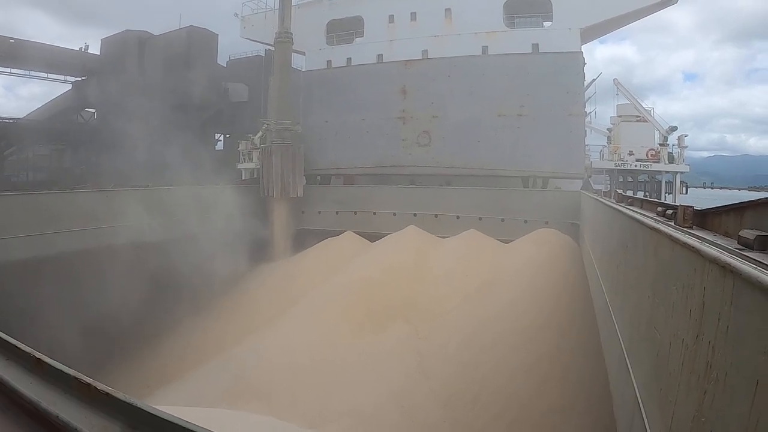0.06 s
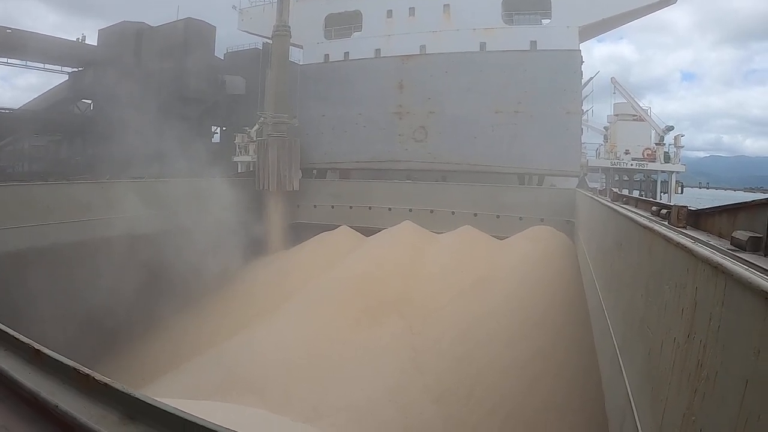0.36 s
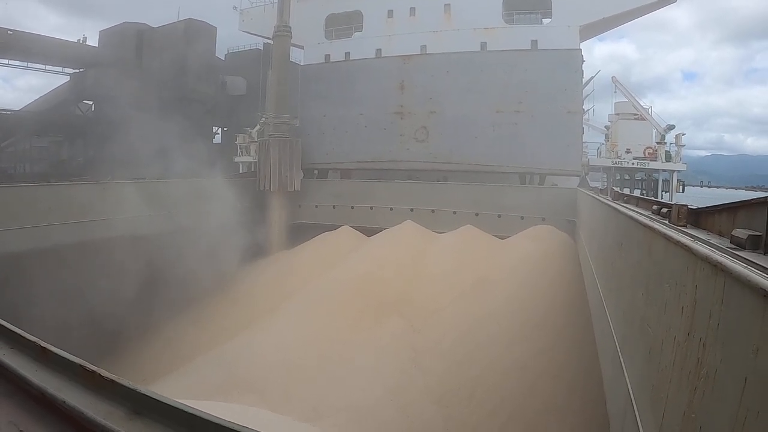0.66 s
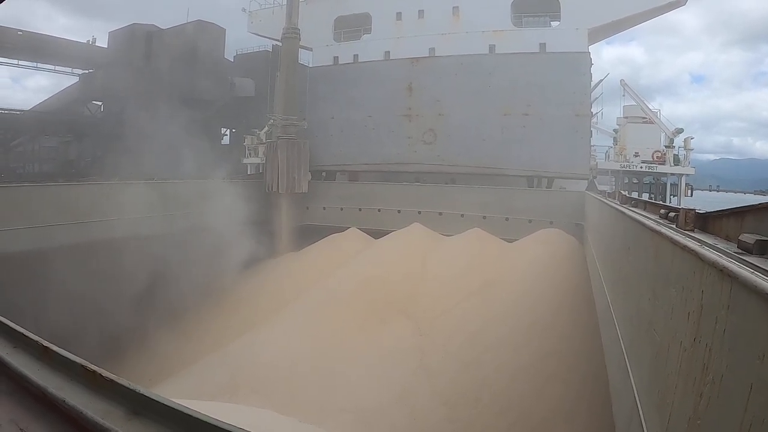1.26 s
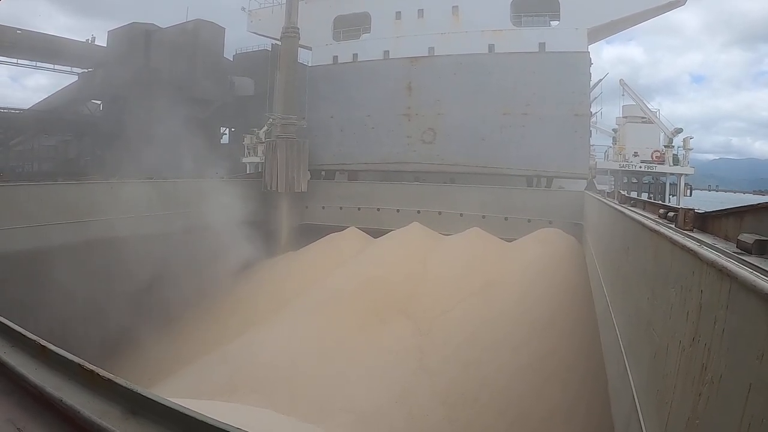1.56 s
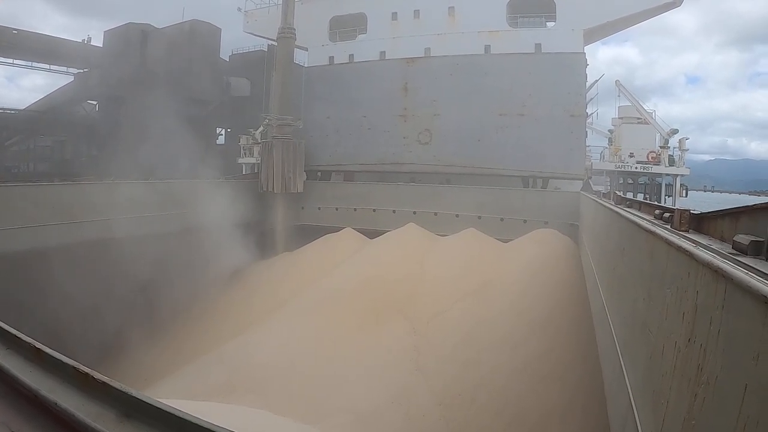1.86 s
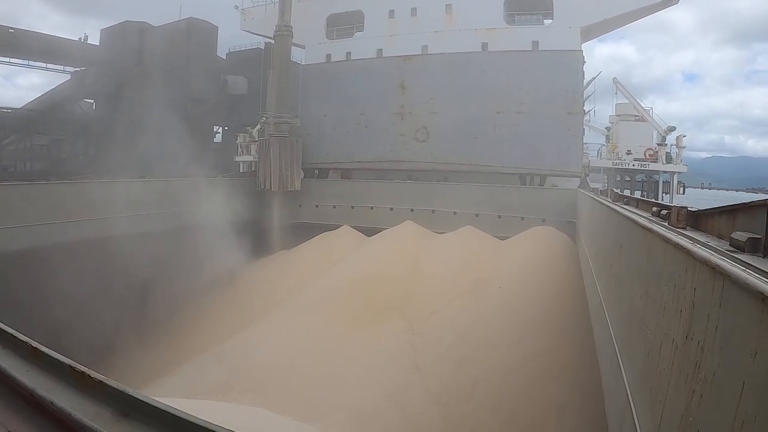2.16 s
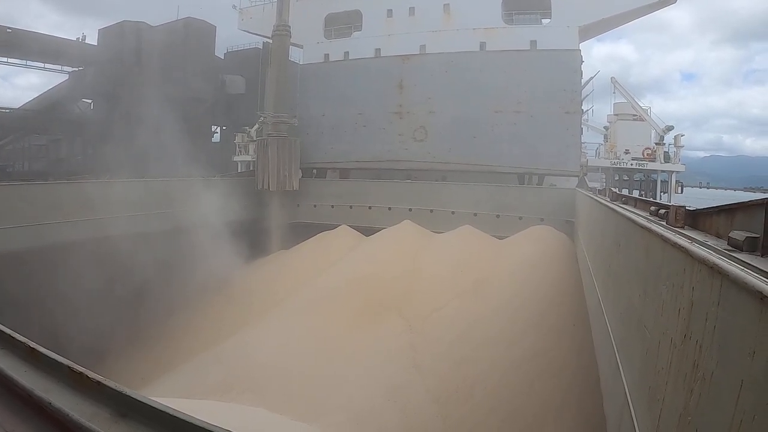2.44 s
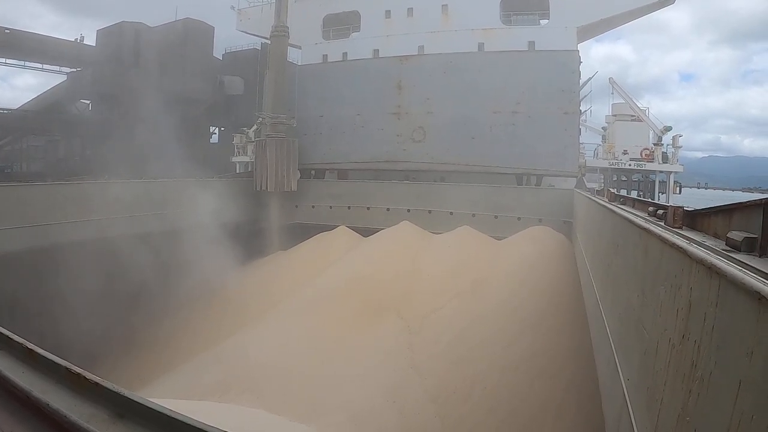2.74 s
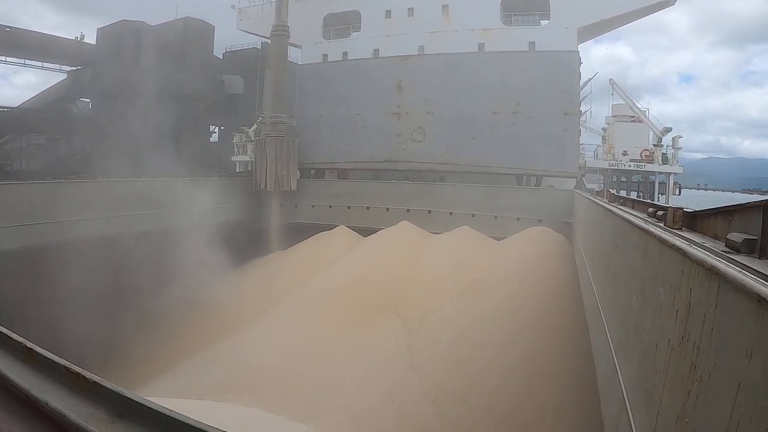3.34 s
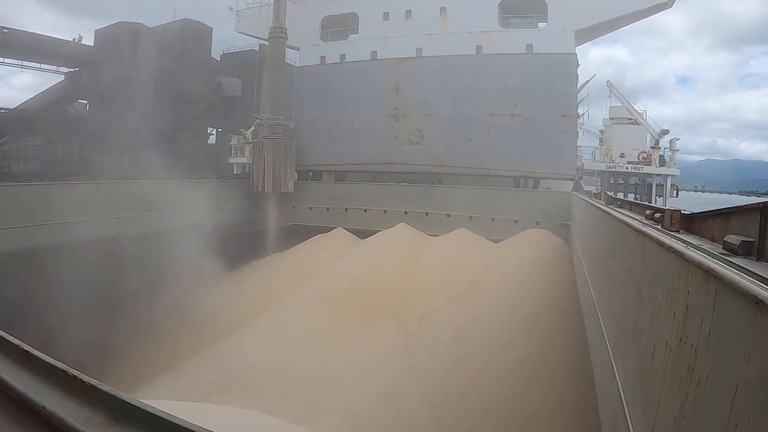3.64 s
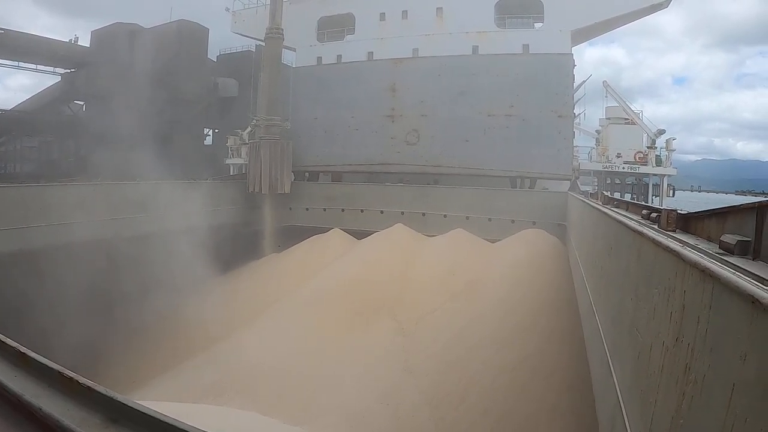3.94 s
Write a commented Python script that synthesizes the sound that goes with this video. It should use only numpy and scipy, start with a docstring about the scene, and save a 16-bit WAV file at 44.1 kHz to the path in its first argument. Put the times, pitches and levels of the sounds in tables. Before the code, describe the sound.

Grain pours into a ship's hold with a steady rush, under wind buffeting the microphone.

```python
"""Grain pouring into a ship

Heard from the hatch rim, grain falls from a ringing steel spout into the hold, and its countless
tiny impacts blend into a rush and a hiss. The loader's drive hums and whines underneath, while
wind rumbles on the microphone and buffets it in short gusts. Close by, a small metal part
scrapes and clinks in the first second, with a few faint scrapes later."""
import sys
import numpy as np
from scipy import signal
from scipy.fft import rfft, irfft
from scipy.io import wavfile
from scipy.ndimage import uniform_filter1d, minimum_filter1d

SR = 44100
rng = np.random.default_rng(int(sys.argv[2]) if len(sys.argv) > 2 else 0)


def master_out(mix):
    """Clip the mix to full scale and print it as 16-bit PCM to the path in sys.argv[1]."""
    frames = np.transpose(np.atleast_2d(mix))
    ceiling = np.clip(frames, -1, 1)
    pcm = np.round(ceiling * 32767).astype(np.int16)
    wavfile.write(sys.argv[1], SR, pcm)


N = 176400

# The pitches at which the small metal part rings: f/Hz, base width/Hz, level/dB
METAL_MODES = [(3155, 60, -1), (3255, 65, 0), (3430, 110, 1), (3540, 130, -3), (3850, 120, -2.5),
               (4220, 60, -2), (4530, 97, -6), (4880, 70, -5), (5290, 68, -10.5), (6060, 170, -16.5),
               (6550, 170, -16), (7840, 200, -18.5), (8550, 180, -24.5), (9650, 150, -29)]


def undb(db):
    """Turn decibels into a gain."""
    return 10 ** (np.asarray(db) / 20)


def unit(x):
    """Scale to an average (rms) level of 1."""
    return x / np.sqrt(np.mean(x ** 2) + 1e-20)


def curve(rows):
    """Gain over time from (t/s, level/dB) points."""
    return undb(np.interp(np.arange(N) / SR, *np.array(rows).T))


def colour(x, points):
    """Give x the tone colour of (f/Hz, level/dB) points, at an average level of 1."""
    hz, db = np.array(points).T
    f = np.maximum(np.arange(N // 2 + 1) * SR / N, 1)
    gain = undb(np.interp(np.log(f), np.log(hz), db))
    return unit(irfft(rfft(x) * gain, N))


def ring(x, hz, width):
    """Make x ring at one pitch by passing it twice through a resonance."""
    resonance = signal.iirpeak(hz, hz / width, fs=SR)
    once = signal.lfilter(*resonance, x)
    return unit(signal.lfilter(*resonance, once))


def walk(rate):
    """Smooth random motion of typical size 1, with up to about rate wiggles a second."""
    f = np.arange(N // 2 + 1) * SR / N
    keep_slow = np.exp(-.5 * (f / rate) ** 2) * (f > 0)
    return unit(irfft(rfft(rng.standard_normal(N)) * keep_slow, N))


def grains(rate, spread_db):
    """Noise with a quickly shifting level, like dense tiny impacts of uneven size."""
    return rng.standard_normal(N) * undb(spread_db * walk(rate))


def wavering_tone(hz, drift_hz):
    """A pure tone that wanders a little in pitch and loudness."""
    pitch_hz = hz + drift_hz * walk(10.4)
    waver_db = 2 * walk(7.1)
    return unit(np.sin(2 * np.pi * np.cumsum(pitch_hz) / SR) * undb(waver_db))


def loader():
    """The loader's drive gives a low hum and a whine that swells and fades."""
    # Tones in the whine: f/Hz, width of the pitch wander/Hz, level relative to the whine/dB
    tones = [(656, 4, 0), (1305, 4, -16), (1706, 10, -17), (1761, 10, -20), (2252, 8, -25), (3863, 8, -28)]
    # Loudness of the whine: t/s, level/dB
    whine_level = [(0, -47.5), (.9, -42.5), (1.5, -41.5), (2.1, -39.5), (2.4, -46), (2.9, -47),
                   (3.5, -44.5), (4, -40)]
    hum = undb(-33) * wavering_tone(hz=89.9, drift_hz=2.52)
    whine = sum(undb(db) * wavering_tone(hz, .5 * width) for hz, width, db in tones)
    return hum + curve(whine_level) * whine


def swell(centre, length):
    """The shape of a gust or a lull: it rises, holds and falls."""
    squareness = 2.34  # 2 is a bell shape, more has steeper sides
    return np.exp(-np.abs((np.arange(N) / SR - centre) / (0.62 * length)) ** squareness)


def wind():
    """Air rumbles on the microphone; gusts thump it and shed swirls that flutter higher up."""
    # Tone colour of the deep rumble: f/Hz, level/dB
    rumble_spectrum = [(12, -21.5), (25, -2.5), (50, 1), (90, -1.5), (130, -3.5), (200, -7), (300, -13),
                       (450, -24.5), (800, -35), (2000, -90.5), (8000, -120)]
    # Tone colour of a gust's thump: f/Hz, level/dB
    thump_spectrum = [(30, -14), (100, 0.5), (220, 3.5), (400, -3), (600, -10.5), (900, -23), (1400, -38.5),
                      (2200, -51.5), (4000, -82.5), (10000, -105)]
    # Tone colour of a gust's flutter: f/Hz, level/dB
    flutter_spectrum = [(200, -2), (500, 14), (900, 4), (1400, -6), (2000, -16), (2800, -22), (6000, -68),
                        (12000, -87.5)]
    # Loudness of the rumble apart from its lulls: t/s, level/dB
    rumble_level = [(0, -17), (.4, -18.5), (.75, -18.5), (1.25, -21), (1.5, -17.5), (1.72, -18.5),
                    (1.95, -20), (2.25, -16), (2.4, -20), (2.65, -18), (3.0, -19), (3.35, -21), (4, -19)]
    # Brief lulls in the rumble: centre/s, length/s, level change/dB
    lulls = [(0.116, 0.027, -5), (0.75, 0.084, -6), (1.632, 0.039, -7), (1.742, 0.041, -2.5),
             (2.364, 0.04, -7), (2.441, 0.018, -11), (2.564, 0.089, -2), (2.891, 0.016, -13.5),
             (3.339, 0.027, -6), (3.542, 0.03, -4), (3.96, 0.073, -4.5)]
    # Gusts: centre/s, length/s, thump level/dB, flutter relative to the thump/dB
    gusts = [(0.047, 0.021, -18, -23), (0.194, 0.044, -22, -25), (0.316, 0.023, -18.5, -12.5),
             (0.377, 0.042, -25.5, -17), (0.438, 0.05, -21, -8), (0.531, 0.085, -23.5, -8.5),
             (0.603, 0.033, -25, -2.5), (0.677, 0.032, -31.5, 4), (0.719, 0.034, -24.5, -4.5),
             (1.049, 0.028, -24, -7.5), (1.475, 0.034, -22.5, -6.5), (1.67, 0.11, -25.5, -26),
             (2.002, 0.071, -26, -8.5), (2.16, 0.029, -25.5, -28), (2.269, 0.045, -19, -8),
             (2.302, 0.018, -24, -5.5), (2.676, 0.027, -18, -31), (2.717, 0.021, -16, -14.5),
             (2.75, 0.03, -25.5, -16), (2.783, 0.0065, -15, -9), (2.799, 0.025, -24.5, -0.5),
             (2.834, 0.031, -18, -22), (2.963, 0.018, -14.5, -10), (2.974, 0.01, -24.5, 1.5),
             (2.991, 0.01, -23, -2.5), (3.007, 0.06, -22.5, -9), (3.203, 0.013, -19.5, -22),
             (3.297, 0.095, -32.5, -12), (3.37, 0.022, -26.5, -15), (3.461, 0.028, -18, -17.5),
             (3.624, 0.08, -20.5, -24), (3.666, 0.052, -22.5, -14), (3.698, 0.022, -15, -9),
             (3.837, 0.018, -21, -8), (3.876, 0.05, -23.5, -9), (3.896, 0.015, -27, 3),
             (3.908, 0.0052, -26.5, 7)]
    thump_power = flutter_power = 0
    for centre, length, db, flutter_db in gusts:
        shape = swell(centre, length)
        thump_power += (undb(db) * shape) ** 2
        flutter_power += (undb(db + flutter_db) * shape) ** 2
    lull_db = sum(db * swell(centre, length) for centre, length, db in lulls)
    swirls = walk(rate=91)  # the same swirls jerk the level of both thump and flutter
    rumble = colour(rng.standard_normal(N), rumble_spectrum) * curve(rumble_level) * undb(lull_db)
    thump = colour(rng.standard_normal(N) * undb(1.5 * swirls), thump_spectrum)
    flutter = colour(rng.standard_normal(N) * undb(4.5 * swirls), flutter_spectrum)
    return rumble + thump * np.sqrt(thump_power) + flutter * np.sqrt(flutter_power)


def scrapes():
    """The metal part sticks and slips in short, dry rubs that rasp and make it ring."""
    # Tone colour of the rubbing: f/Hz, level/dB
    rub_spectrum = [(1200, -11.5), (2300, -2), (2900, 3), (3250, -2.5), (3800, -3.5), (4400, -5.5),
                    (5200, -9), (5700, -12.5), (6600, -12.5), (8500, -28), (10500, -33.5), (14000, -48.5)]
    # Rubs: start/s, time until the fade/s, rasp level/dB, ringing relative to the rasp/dB
    rubs = [(0.087, 0.026, -48.5, -3), (0.115, 0.097, -44, 3), (0.211, 0.023, -46.5, -3),
            (0.251, 0.026, -39, -4), (0.285, 0.0082, -41, 1.5), (0.563, 0.005, -49, 4),
            (0.582, .008, -46, 0), (0.715, 0.0061, -49, 9), (0.743, 0.025, -51, 8.5),
            (1.868, 0.037, -49, -18), (2.22, 0.016, -51, -8), (2.934, 0.011, -54.5, 1),
            (3.529, 0.042, -48.5, -15)]
    attack_s, decay_s = .004, 0.01
    t = np.arange(N) / SR
    rasp = colour(grains(rate=400, spread_db=1.5), rub_spectrum)
    slips = colour(grains(rate=400, spread_db=1.5), rub_spectrum)
    ringing = unit(sum(undb(db) * ring(slips, hz, 1.6 * width) for hz, width, db in METAL_MODES))
    out = 0
    for start, length, db, ring_db in rubs:
        rise = np.clip((t - start) / attack_s, 0, 1)
        fade = np.exp(-np.maximum(t - start - length, 0) / decay_s)
        out += undb(db) * rise * fade * (rasp + undb(ring_db) * ringing)
    return out


def clinks():
    """The metal part knocks: a brief, bright crack, then it rings out."""
    # Knocks: t/s, level/dB, crack relative to that level/dB
    knocks = [(.128, -45, -4), (0.156, -48, 4), (0.212, -43, 4), (0.261, -38, 1), (.57, -34.5, 4),
              (.7395, -43, -5)]
    # Tone colour of the crack: f/Hz, level/dB
    crack_spectrum = [(1500, -20), (3300, 7), (4500, 2.5), (6000, -18), (8200, -13), (10500, -26.5),
                      (14000, -41)]
    rise_s, crack_decay_s = .0005, 0.0069
    damping = 0.54  # the free part rings longer than when it is rubbed
    t = np.arange(N) / SR
    crack = colour(rng.standard_normal(N), crack_spectrum) * np.exp(-t / crack_decay_s)
    rise = 1 - np.exp(-(t / rise_s) ** 2)
    out = 0
    for start, db, crack_db in knocks:
        ringing = 0
        for hz, width, mode_db in METAL_MODES:
            tone = np.sin(2 * np.pi * hz * t + rng.uniform(0, 2 * np.pi))
            ringing += undb(mode_db) * tone * np.exp(-np.pi * width * damping * t)
        clink = rise * (ringing + undb(crack_db) * crack)
        out += undb(db) * np.pad(clink, (int(start * SR), 0))[:N]
    return out


def pouring_grain():
    """Countless kernels ring the spout and land on the heap with a full rush and a finer hiss."""
    # Tone colour of the rush: f/Hz, level/dB
    rush_spectrum = [(150, -8), (350, -4.5), (600, 0.5), (850, -0.5), (1300, -6.5), (1700, -8.5),
                     (2100, -13), (2800, -19), (4000, -30), (12000, -73)]
    # Tone colour of the hiss: f/Hz, level/dB
    hiss_spectrum = [(1200, -10), (2200, 6.5), (2800, -0.5), (3250, 1.5), (3600, 0.5), (4050, 0),
                     (4700, -5), (5700, -11.5), (7800, -19), (9500, -30.5), (12000, -51), (15000, -71)]
    # Loudness of the rush: t/s, level/dB
    rush_level = [(0, -42.5), (.8, -41), (1.3, -36.5), (1.6, -36), (2.1, -36), (2.4, -41.5), (2.7, -38.5),
                  (2.92, -41.5), (3.15, -46.5), (3.35, -47), (3.6, -43.5), (4, -40)]
    # Loudness of the hiss: t/s, level/dB
    hiss_level = [(0, -47.5), (.5, -49.5), (.85, -46.5), (1.1, -47.5), (1.6, -47.5), (2.15, -49),
                  (2.48, -52), (2.6, -52), (3.25, -52.5), (3.5, -50.5), (3.75, -49.5), (4, -49.5)]
    # The steel spout's ringing pitches: f/Hz, base width/Hz, level relative to the rush/dB
    spout_modes = [(1125, 47, -17), (1609, 45, -17), (1680, 31, -19), (1781, 18, -25), (3840, 85, -24.5),
                   (3973, 90, -27), (4062, 19, -27), (7525, 40, -46), (8120, 35, -45)]
    rush = colour(grains(rate=300, spread_db=0.5), rush_spectrum)
    hiss = colour(grains(rate=900, spread_db=0.5), hiss_spectrum)
    spout = sum(undb(db) * ring(grains(rate=900, spread_db=0.5), hz, 1.2 * width)
                for hz, width, db in spout_modes)
    stream = (rush + spout) * curve(rush_level) + hiss * curve(hiss_level)
    flicker_db = 0.74 * walk(5.6)
    return stream * undb(flicker_db)


def scene():
    """All the sources, added into one channel."""
    return (pouring_grain() + loader() + wind() + scrapes() + clinks())[None]


def record(dry):
    """Turn down the strongest wind peaks smoothly, then cut the highest treble."""
    ceiling_db, top_hz = -7, 14500
    gain = np.minimum(1, undb(ceiling_db) / (np.abs(dry) + 1e-9))
    gain = minimum_filter1d(gain, size=441)  # hold each dip for 10 ms
    gain = uniform_filter1d(uniform_filter1d(gain, size=221), size=221)  # round off its edges
    treble_cut = signal.ellip(8, .2, 70, top_hz, fs=SR, output="sos")
    return signal.sosfilt(treble_cut, dry * gain)


dry = scene()
out = record(dry)
master_out(out)
```